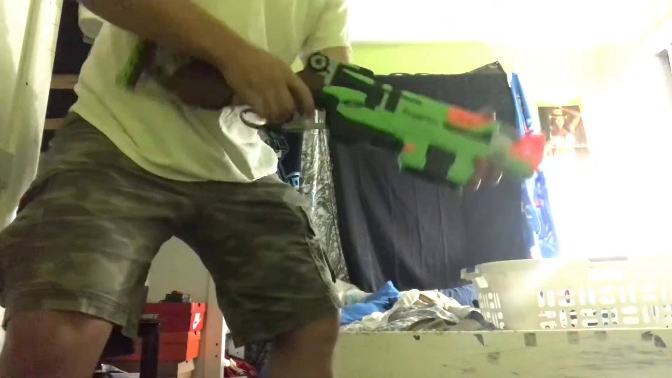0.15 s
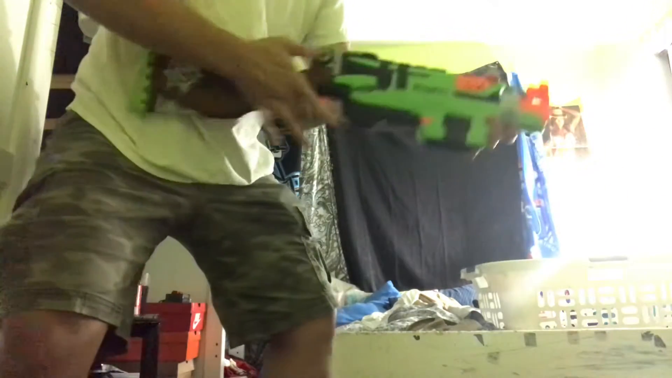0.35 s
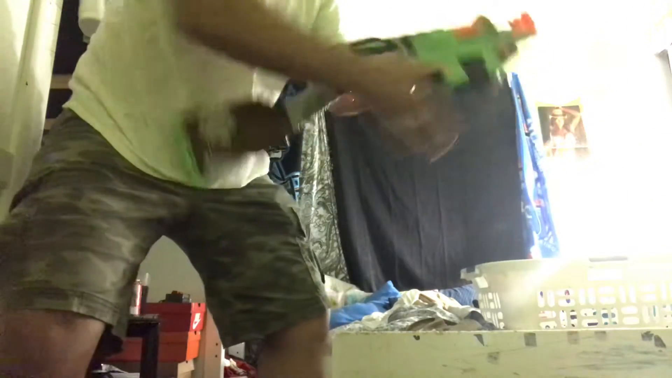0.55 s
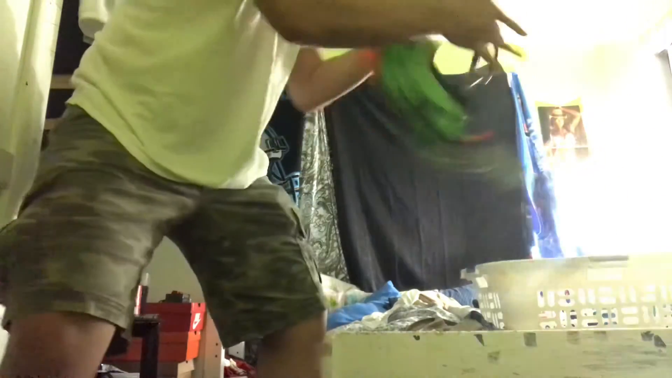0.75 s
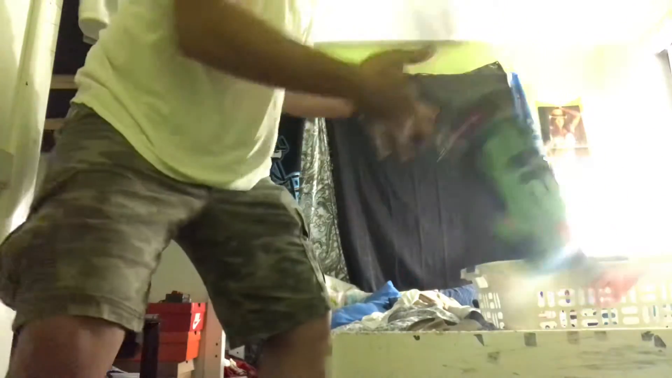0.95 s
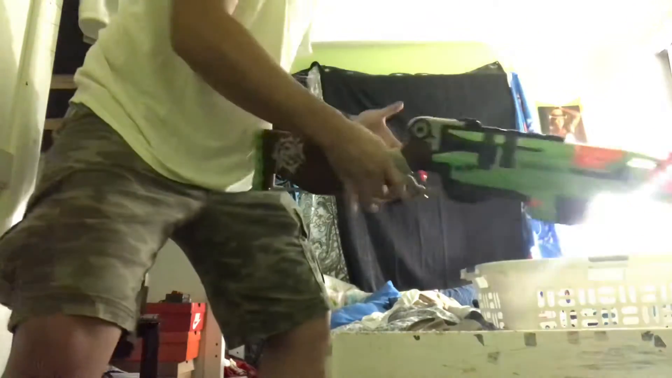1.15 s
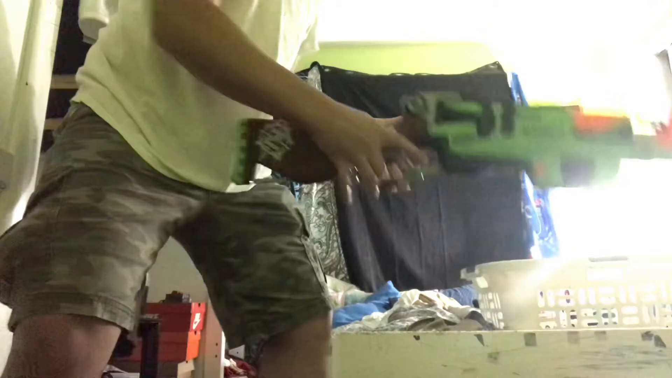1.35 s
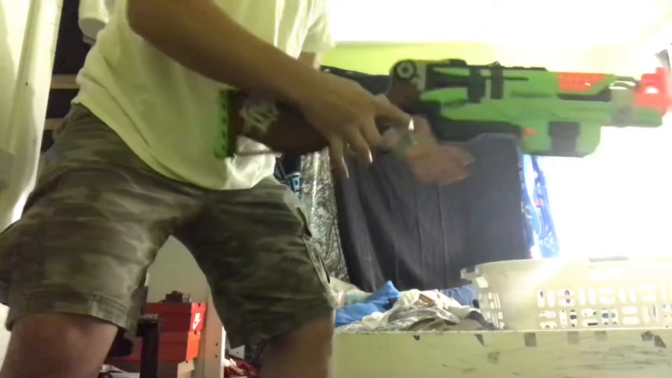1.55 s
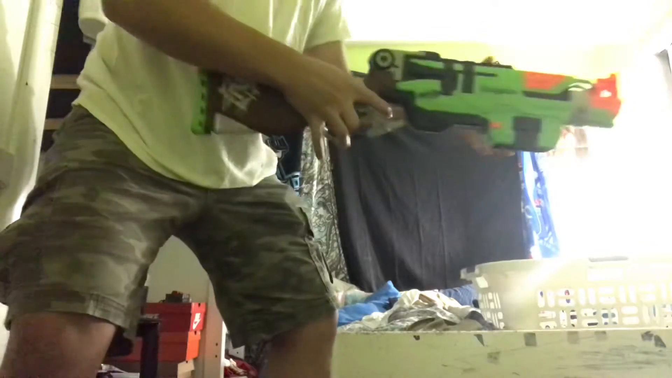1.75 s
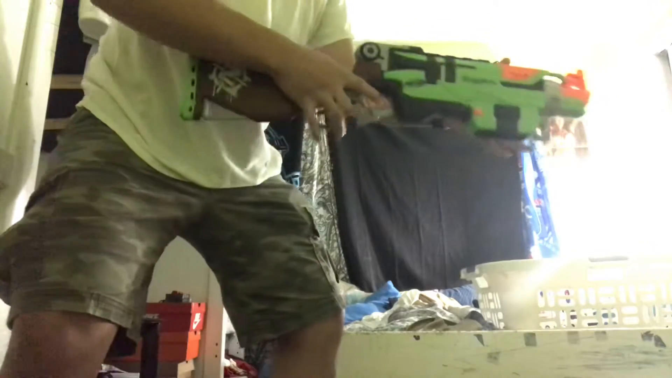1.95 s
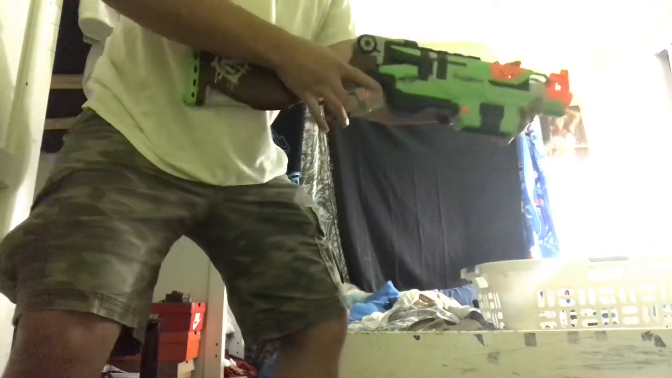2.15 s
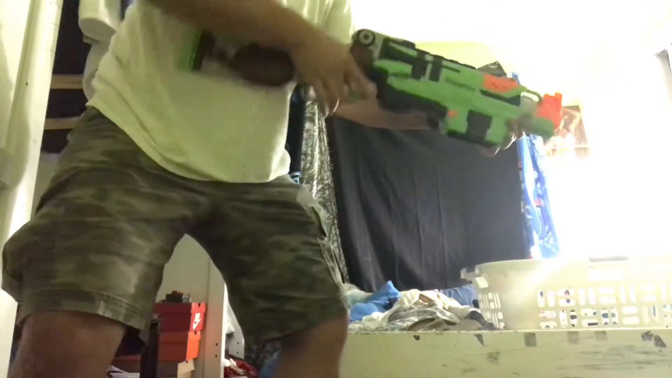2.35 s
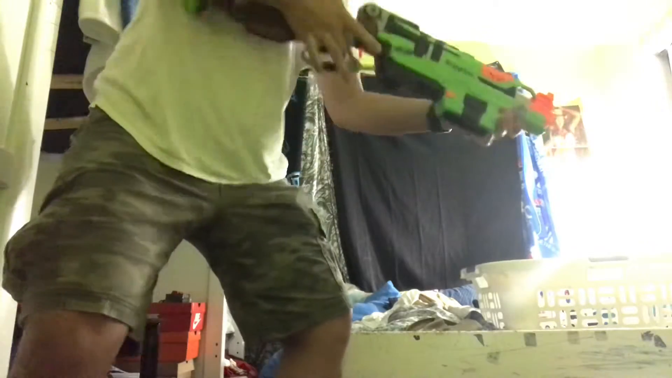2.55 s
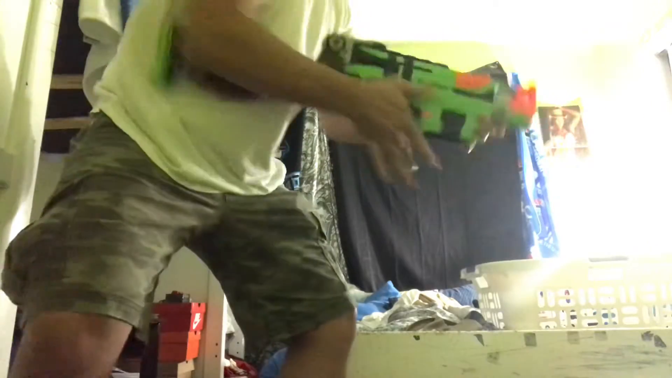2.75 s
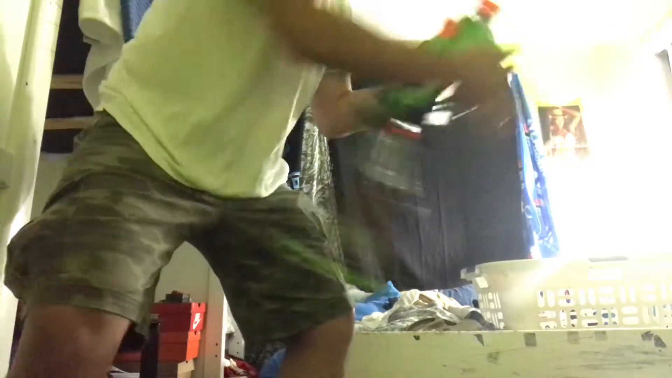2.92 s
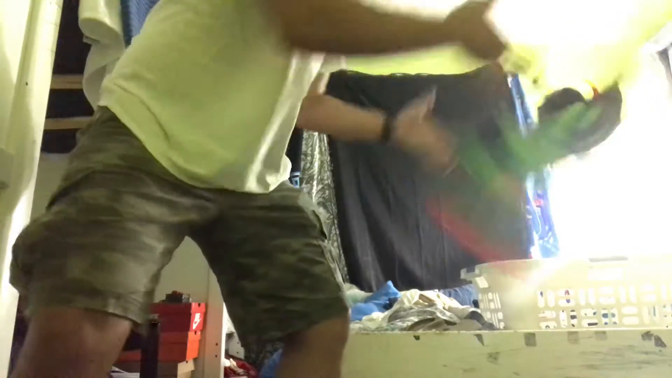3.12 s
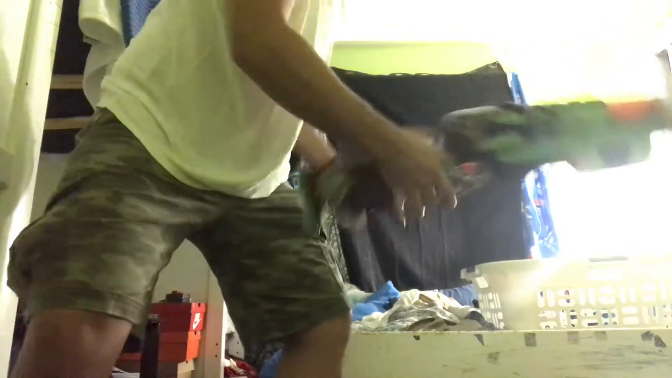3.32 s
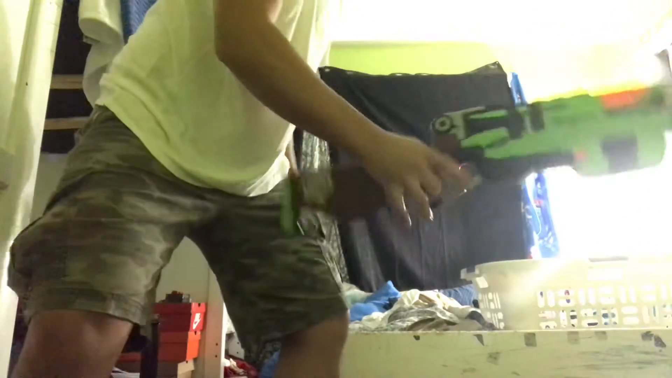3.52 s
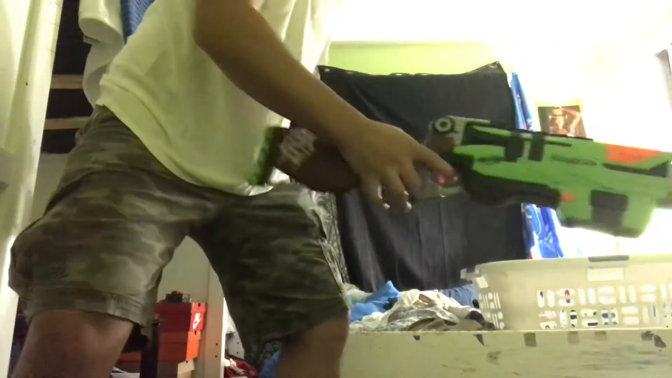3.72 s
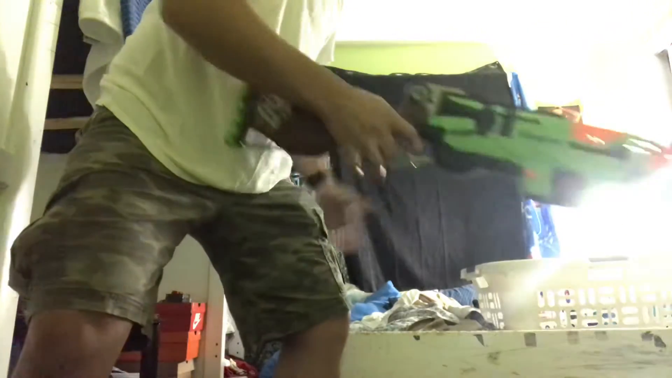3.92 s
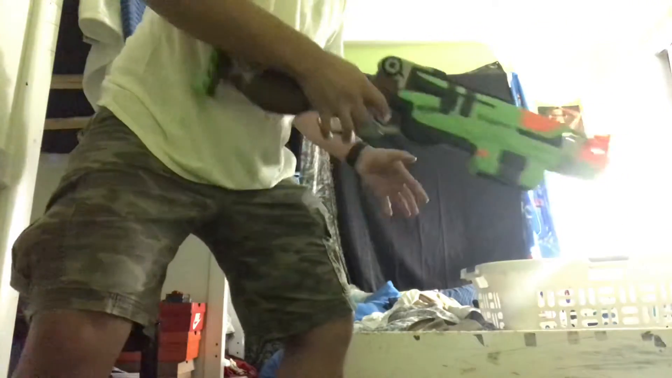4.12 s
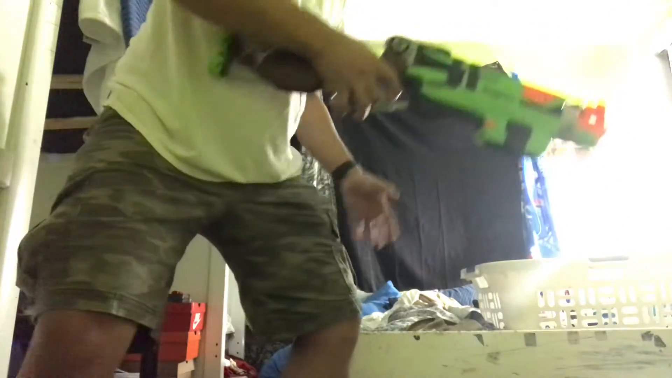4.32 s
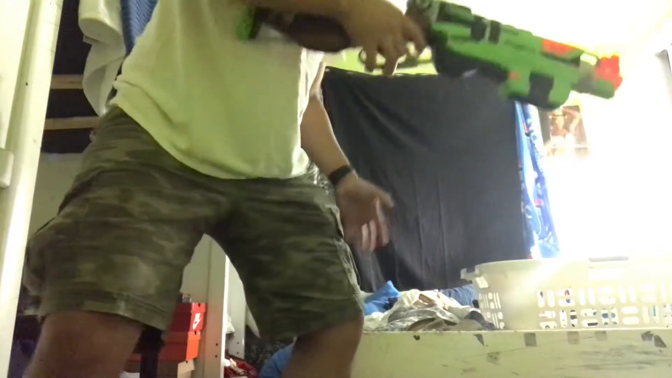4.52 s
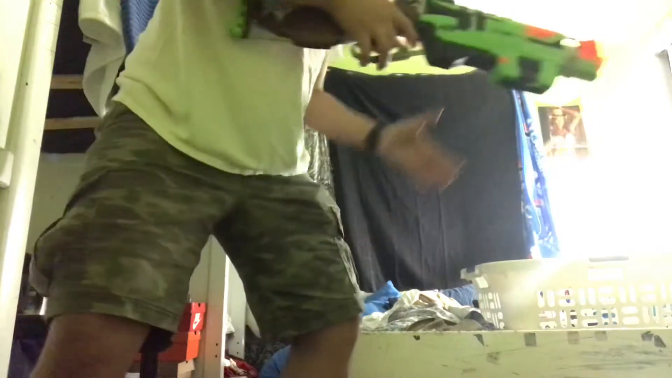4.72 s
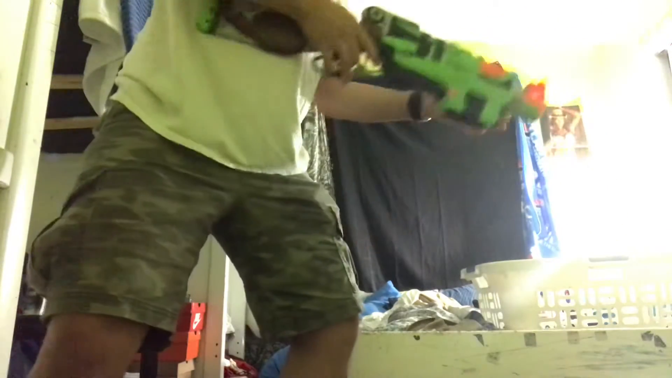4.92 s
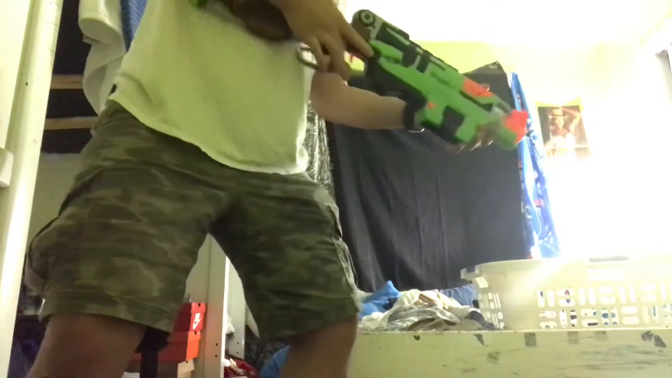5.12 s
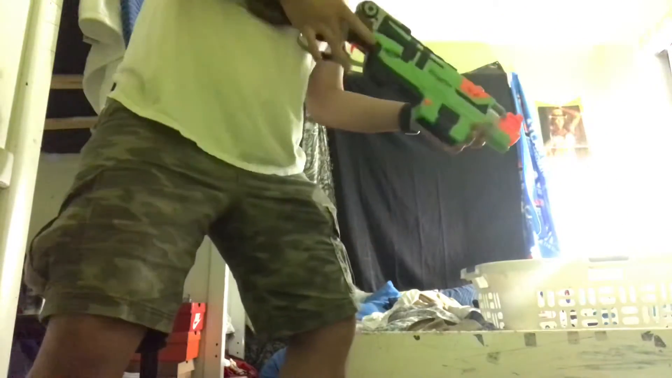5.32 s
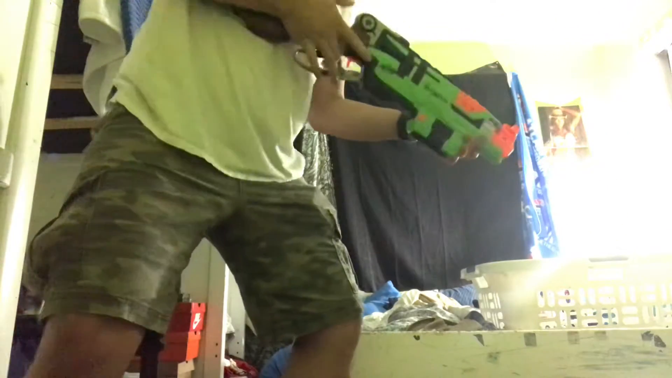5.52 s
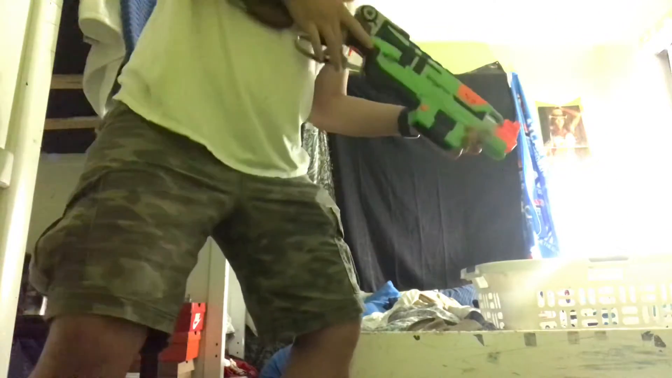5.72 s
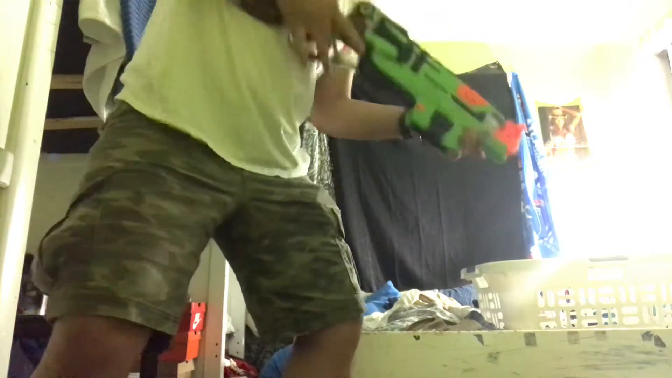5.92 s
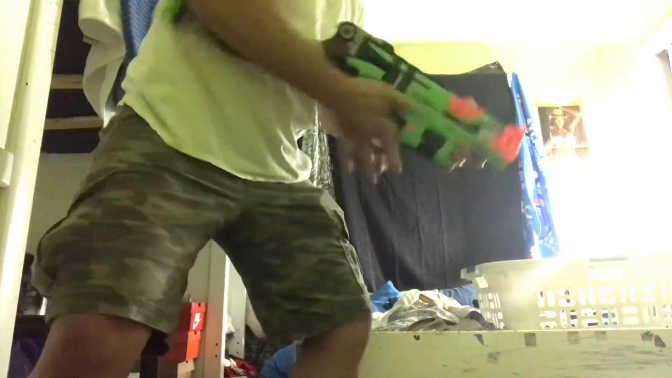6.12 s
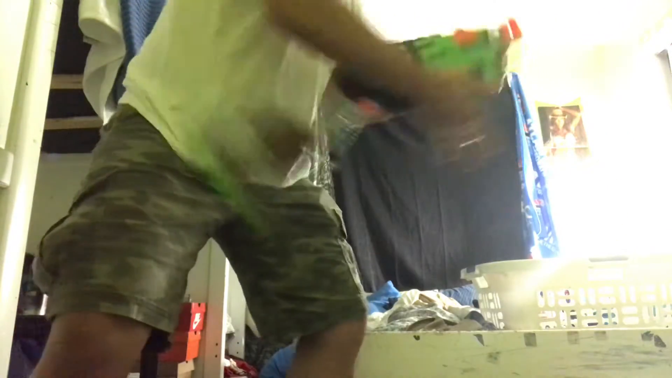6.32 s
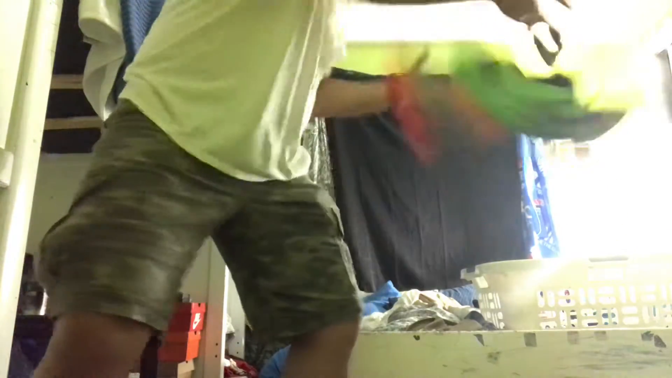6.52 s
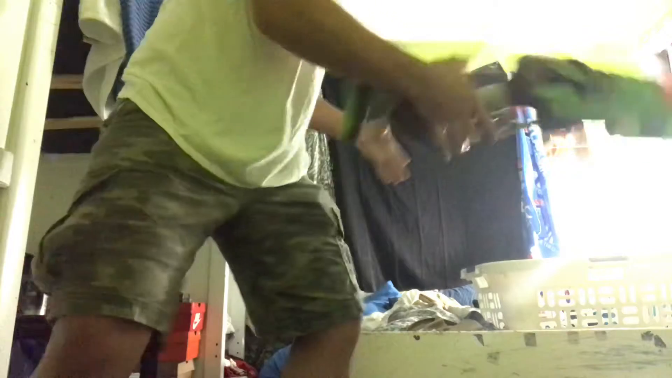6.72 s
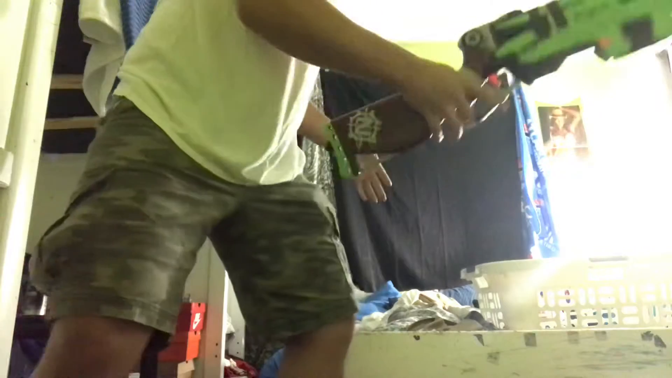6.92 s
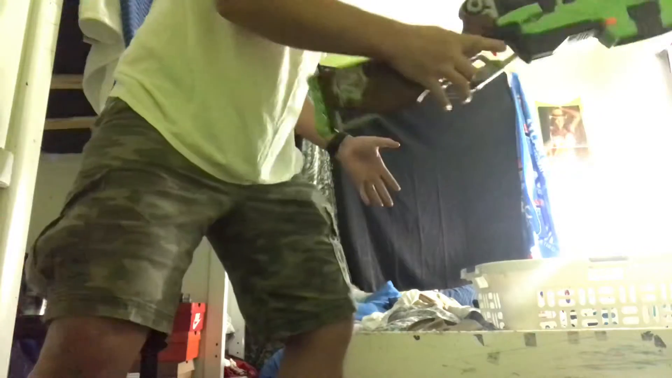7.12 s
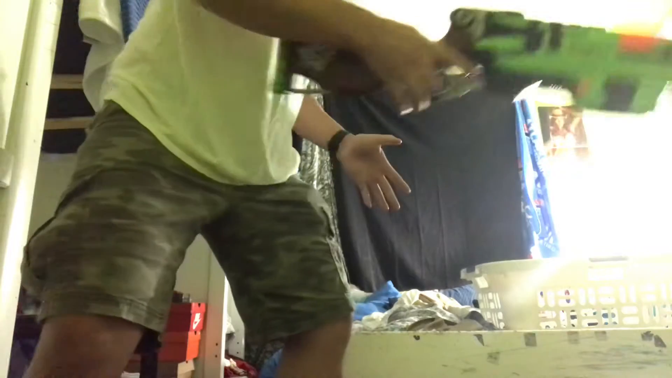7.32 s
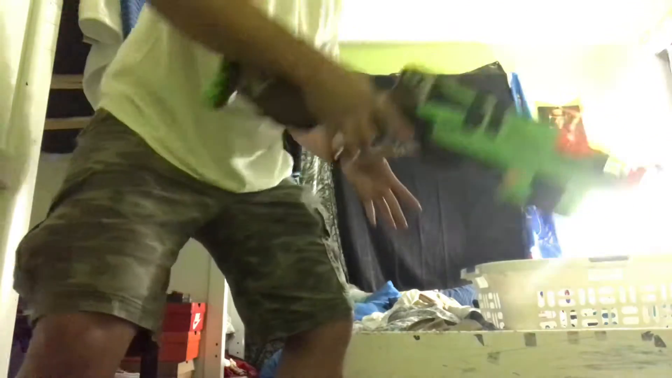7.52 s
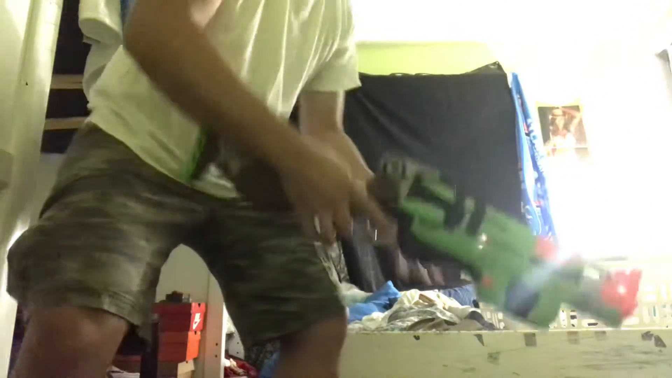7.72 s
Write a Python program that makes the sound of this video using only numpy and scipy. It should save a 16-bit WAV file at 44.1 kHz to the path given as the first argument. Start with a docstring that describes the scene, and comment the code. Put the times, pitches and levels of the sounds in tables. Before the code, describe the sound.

A close, slightly dull-topped microphone catches a hollow plastic toy being spun and cocked by its lever. Sharp bright clacks, scraping slides and tiny runs of ratchet teeth lead to thudding slams with a short low boom. Three rounds of action are separated by small ticks and rustling clothes; the longest lull comes before the third. The small room answers briefly over quiet hum and room noise.

```python
"""In a small furnished room, a hollow plastic toy gun is spun by its lever and cocked again and again.
Blows excite damped low and mid modes, with short noise bursts for the dense treble modes; sliding,
rattling and cloth swishes are dense uneven clicks, and ratchet teeth strike in quick runs.
The heaviest slams boom as low decaying sines; the room answers with a diffuse tail.
A wavering mains hum and a fuzzy low drone lie over quiet room noise and a rustle."""
import sys
import numpy as np
from scipy import signal
from scipy.io import wavfile
from scipy.ndimage import uniform_filter1d

SR = 44100
rng = np.random.default_rng(int(sys.argv[2]) if len(sys.argv) > 2 else 0)


def generate_wav(sig):
    """Save sig (samples, or channels by samples) to the path in sys.argv[1] as 16-bit PCM at SR."""
    pcm = np.round(np.clip(np.atleast_2d(sig).T, -1, 1) * 32767).astype(np.int16)
    wavfile.write(sys.argv[1], SR, pcm)


N = 346626

# modes of the gun, the low knock first, then the mid clack: pitch_hz, relative_level_db, t60_s
GUN_MODES = [(219.4, -8.5, 0.076), (267, -10, 0.066), (336.3, -6, 0.06), (422.8, 0.5, 0.048),
             (483, -2, 0.064), (550.7, -2.5, 0.069), (617.8, 1, 0.065), (704.5, -5.5, 0.058),
             (549.4, -14.5, .2), (855.5, -9.5, 0.064), (983, 2, 0.029), (1121, 1, 0.028),
             (1245, -1.5, 0.025), (1544, 0.5, 0.022), (1684, -0.5, 0.029), (1824, 2.5, 0.023),
             (2088, -5, 0.028), (2290, -9.5, 0.021)]
KNOCK_MODES, CLACK_MODES = GUN_MODES[:9], GUN_MODES[9:]
# spectrum of the dense treble modes: frequency_hz, relative_level_db_per_hz
TREBLE_SPECTRUM = [(1180, -47), (2000, 3.5), (2680, -2), (2930, -2), (4360, -4.5), (4920, -7), (6540, -5),
                   (7710, -9.5), (9320, -7), (10500, -11.5), (11400, -7), (14200, -12), (15800, -15.5)]


def gain_of(db):
    """Decibels are logarithmic: 20 dB is a tenfold amplitude."""
    return 10 ** (np.asarray(db) / 20)


def evened(x):
    """Normalization by the root mean square: the result has rms 1."""
    return x / np.sqrt(np.mean(x ** 2) + 1e-20)


def read(points, hz):
    """Interpolation of a spectrum along a logarithmic frequency axis."""
    point_hz, value = np.transpose(points)
    return np.interp(np.log(hz + 1), np.log(point_hz + 1), value)


def add(mix, start_s, sound):
    """Superposition: a sound adds to the mix from its start time."""
    part = mix[max(round(start_s * SR), 0):][:len(sound)]
    part += sound[:len(part)]


def colour(points, lo_hz=1, hi_hz=30000):
    """Minimum phase: the log spectrum fixes a causal filter, here of unit energy between two edges."""
    hz = abs(np.fft.fftfreq(4096, 1 / SR)) + 1
    edges = np.sqrt((1 + (lo_hz / hz) ** 8) * (1 + (hz / hi_hz) ** 8))
    log_gain = np.log(np.maximum(gain_of(read(points, hz)) / edges, 1e-5))
    # the Hilbert transform of the log gain supplies the phase
    taps = np.fft.ifft(np.exp(np.conj(signal.hilbert(log_gain)))).real[:2048]
    return taps / np.linalg.norm(taps)


def drift(top_hz):
    """Low-pass filtering turns white noise into a slow random motion, rms 1."""
    low_pass = signal.butter(2, top_hz, fs=SR, output="sos")
    return evened(signal.sosfilt(low_pass, rng.standard_normal(N)))


def noise(points, patchy_db, flicker_db):
    """Short-time synthesis: random spectra with drifting patches and broadband flicker, rms 1."""
    frames, hz = N // 256 + 5, np.fft.rfftfreq(1024, 1 / SR)
    real, imaginary, patches = rng.standard_normal((frames, 513, 3)).T
    patches = uniform_filter1d(patches, 12, 0)  # smooth over frequency
    patches = evened(uniform_filter1d(patches, 8, 1))  # smooth over time
    flicker = evened(uniform_filter1d(rng.standard_normal(frames), 3))
    level_db = read(points, hz)[:, None] + patchy_db * patches + flicker_db * flicker
    spectra = (real + 1j * imaginary) * gain_of(level_db)
    return evened(signal.istft(spectra, nperseg=1024, noverlap=768)[1][:N])


def room_noise():
    """Filtered noise: a fixed spectrum colours random noise that drifts and flickers."""
    # frequency_hz, relative_level_db_per_hz
    air_spectrum = [(15, -54.5), (25, -5), (72, -3), (123, -19.5), (144, -19), (174, -18), (403, -20),
                    (486, -23), (791, -33.5), (1220, -35), (2200, -33), (13100, -46.5), (15800, -47)]
    return noise(air_spectrum, patchy_db=3.5, flicker_db=1.0)


def mains_hum():
    """Amplitude modulation: a steady sine near 120 Hz wavers at random."""
    hum_hz, waver_top_hz, waver_rms_db = 119.7, 11, 0.9
    sine = np.sqrt(2) * np.sin(2 * np.pi * hum_hz * np.arange(N) / SR)
    return sine * gain_of(waver_rms_db * drift(waver_top_hz))


def low_drone():
    """Narrow-band noise: two slow random motions modulate a sine and a cosine in quadrature."""
    centre_hz, half_width_hz = 56.6, 4.6
    turn = 2 * np.pi * centre_hz * np.arange(N) / SR
    return drift(half_width_hz) * np.sin(turn) + drift(half_width_hz) * np.cos(turn)


def rustle():
    """Amplitude modulation: rustling noise on a drawn level curve, swelling after the heavy blows."""
    # level of the rustle: time_s, level_db
    rustle_levels = [(0.0, -41.5), (0.24, -58), (0.85, -52), (1.33, -62.5), (1.62, -50), (1.95, -62.5),
                     (2.63, -69), (2.76, -53.5), (3.81, -66), (4.05, -51.5), (4.33, -63.5), (4.77, -70),
                     (6.0, -60.5), (6.22, -53.5), (6.39, -67.5), (6.7, -53.5), (7.16, -65.5), (7.86, -66)]
    # frequency_hz, relative_level_db_per_hz
    rustle_spectrum = [(88, -45.5), (150, -20), (264, -1.5), (447, -5), (564, -1.5), (610, 1.5), (801, -2),
                       (1120, -2), (2630, -16), (12800, -31), (15800, -34.5)]
    level_db = np.interp(np.arange(N) / SR, *np.transpose(rustle_levels))
    return gain_of(level_db) * noise(rustle_spectrum, patchy_db=1.1, flicker_db=2.5)


def background():
    """Superposition of independent sources: rustle, hum, drone and room noise."""
    # level of the hum, which drone and room noise follow: time_s, level_db
    hum_levels = [(0.0, -54.5), (1.34, -54), (1.74, -55), (2.11, -55.5), (2.47, -49), (4.67, -55),
                  (7.8, -58)]
    drone_db, air_db = -8, -2.5  # against the hum
    hum_level_db = np.interp(np.arange(N) / SR, *np.transpose(hum_levels))
    steady = mains_hum() + gain_of(drone_db) * low_drone() + gain_of(air_db) * room_noise()
    return rustle() + gain_of(hum_level_db) * steady


def room(x):
    """Diffuse reverberation: sparse taps of random sign, each band decaying at its own rate."""
    # bands of the tail: frequency_hz, t60_s, relative_level_db
    bands = np.array([(100, 0.063, -9), (406, 0.14, -3.5), (1070, 0.22, -3.5), (3057, 0.2, -2),
                      (8000, 0.17, 0.5), (14900, 0.12, -2.5)])
    count, step_s = 6, .012  # the paths change as the gun moves: six tails crossfade in a cycle
    build_s = 0.0059  # the walls answer a few milliseconds late
    out = np.zeros(N)
    place = np.arange(N) / SR / step_s % count
    for k in range(count):
        away = (place - k + count / 2) % count - count / 2
        share = np.cos(np.pi / 2 * np.clip(away, -1, 1))
        taps = np.zeros(SR // 2)
        at = np.arange(120, SR // 2 - 10, 10)
        build = 1 - np.exp(-(at / SR / build_s) ** 2)
        taps[at + rng.integers(0, 10, len(at))] = build * rng.choice([-1., 1.], len(at))
        hz, t, spectra = signal.stft(taps, SR, nperseg=256)
        start_db = read(bands[:, [0, 2]], hz)[:, None]
        t60_s = read(bands[:, :2], hz)[:, None]
        spectra *= gain_of(start_db - 60 * t / t60_s)
        tail = signal.istft(spectra, SR, nperseg=256)[1]
        out += signal.oaconvolve(x * share, tail / np.linalg.norm(tail))[:N]
    return out


def booms():
    """Modal resonance: a slam excites a low room mode that swells briefly and dies."""
    # heavy slams that shake the room: start_s, swell_peak_db, pitch_hz
    slams = [(0.014, -15, 75), (0.965, -36, 70.5), (0.986, -28, 74), (1.486, -54, 74), (1.533, -16, 75),
             (3.223, -48.5, 75), (3.238, -24.5, 71.7), (3.907, -14.5, 73.7), (6.712, -33.5, 75.3),
             (7.848, -16.5, 70.5)]
    swell_s = 0.0081  # time to the peak of the envelope
    out, t = np.zeros(N), np.arange(9000) / SR
    swell = t / swell_s * np.exp(1 - t / swell_s)
    for start_s, peak_db, pitch_hz in slams:
        add(out, start_s, gain_of(peak_db) * swell * np.sin(2 * np.pi * pitch_hz * t))
    return out


def ring(modes, chance, spread_db, detune, rise_s, spot_hz=1200, focus_db=0):
    """Modal excitation: the struck spot favours damped modes near its own pitch; peak 1."""
    hz, db, t60_s = np.transpose(modes)[:, :, None]
    t = np.arange(5000) / SR
    spot, grip, phase = chance[:, :len(modes), None]
    focus_loss_db = np.minimum(focus_db * np.log2(hz / spot_hz) ** 2, 11)
    mode_db = db + spread_db * spot - focus_loss_db
    decay = gain_of(mode_db - 60 * t / t60_s)
    waves = decay * np.sin(2 * np.pi * hz * (1 + detune * grip) * t + phase)
    sound = waves.sum(0) * (1 - np.exp(-t / rise_s)) ** 2
    return sound / abs(sound).max()


def slides():
    """Source and filter: dense uneven clicks through the modes make sliding, rattling and cloth swishes."""
    # strokes of sliding, rattling and cloth swishes, brightness being the treble against the force:
    # start_s, length_s, first_force_db, last_force_db, brightness_db
    strokes = [(.018, 0.053, -13, -19.5, -6.5), (0.165, 0.052, -36.5, -37.5, -12),
               (0.296, 0.036, -55.5, -41.5, -1.5), (0.429, .008, -50, -43.5, 1),
               (0.438, .045, -48.5, -13.5, -17.5), (0.494, 0.13, -19.5, -29.5, -2.5),
               (0.546, 0.02, -32, -21, -12), (0.586, 0.021, -30, -47, 9.5), (.865, 0.13, -47, -30, 0),
               (0.95, 0.046, -20.5, -17, -4.5), (1.531, 0.061, -7.5, -27, -7),
               (2.618, 0.032, -37.5, -12.5, -11.5), (2.653, 0.12, -12.5, -33.5, -3.5),
               (2.704, .016, -32.5, -22, -9.5), (2.733, 0.01, -16.5, -24, -14.5),
               (2.858, 0.071, -30, -37.5, -11.5), (3.137, 0.013, -56, -46, 1), (3.152, 0.086, -36, -30, 3),
               (3.24, 0.024, -14, -15, -14.5), (3.905, .061, -11.5, -22, -4.5),
               (4.887, .03, -50, -57, -20.5), (4.927, 0.12, -46.5, -54, -8), (5.39, 0.11, -61, -58, -3),
               (6.042, .022, -38.5, -18, -4), (6.067, 0.087, -12.5, -33, 0),
               (6.129, .014, -35.5, -22.5, -10.5), (6.145, .02, -12.5, -40, -0.5),
               (6.284, .11, -34, -35, -16), (6.615, .016, -52.5, -37, -15), (6.649, 0.082, -37, -29, 6.5),
               (6.723, 0.019, -18, -52, 3)]
    modes_db, treble_db = -13.5, -8.5  # how readily the gun modes and the treble answer the force
    grip_s, let_go_s = 0.0022, 0.039  # a stroke takes hold, then dies away (60 dB)
    clicks_per_s = 3000
    low, high = np.zeros((2, N))
    u = np.arange(SR // 4) / SR
    for start_s, length_s, first_db, last_db, bright_db in strokes:
        force_db = np.interp(u, (0, length_s), (first_db, last_db))
        force_db = force_db - 60 * np.maximum(u - length_s, 0) / let_go_s
        force = np.minimum(u / grip_s, 1) * gain_of(force_db)
        add(low, start_s, force * gain_of(modes_db))
        add(high, start_s, force * gain_of(bright_db + treble_db))
    strength = gain_of(2.4 * np.minimum(rng.exponential(1, N), 3.5))
    happens = rng.random(N) < clicks_per_s / SR
    clicks = evened(happens * strength * rng.choice([-1, 1], N))
    chance = rng.standard_normal((3, len(GUN_MODES)))
    response = ring(GUN_MODES, chance, spread_db=2.5, detune=0, rise_s=0.00016)
    low_sound = signal.oaconvolve(clicks * low, response / np.linalg.norm(response))[:N]
    treble_sound = signal.oaconvolve(clicks * high, colour(TREBLE_SPECTRUM, 2300))[:N]
    return low_sound + treble_sound


def ratchet_teeth():
    """Near-periodic impacts: evenly spaced, slightly uneven strikes whose level glides along each run."""
    # runs of teeth as the lever swings home: start_s, end_s, first_clack_db, last_clack_db
    runs = [(0.9123, 0.963, -27.5, -25.5), (3.185, 3.218, -24, -27), (6.667, 6.699, -24, -28)]
    # one tooth, levels against the clack: clack_hz, knock_db, knock_hz, crack_db, tick_db
    clack_hz, knock_db, knock_hz, crack_db, tick_db = (1346, -8.5, 616, -4, 4)
    teeth_per_s, jitter_s, spread_db = 108, .001, 1.5  # jitter and spread are rms
    rows = []
    for start_s, end_s, first_db, last_db in runs:
        luck = rng.standard_normal((12, 4))
        for s, chance in zip(np.arange(start_s, end_s, 1 / teeth_per_s), luck):
            db = np.interp(s, (start_s, end_s), (first_db, last_db)) + spread_db * chance[1:]
            rows.append((s + jitter_s * chance[0], db[0], clack_hz, db[1] + knock_db, knock_hz,
                         db[2] + crack_db, db[2] + tick_db))
    return rows


def strikes():
    """Impact excitation: a blow rings the low and mid modes and sends noise bursts through the treble."""
    # individually timed strikes, including the louder ratchet teeth; mid clack, low knock,
    # treble crack below 6.5 kHz and high tick above:
    # start_s, clack_db, clack_hz, knock_db, knock_hz, crack_db, tick_db
    timed_strikes = [(0.013, -8.5, 1520, -17.5, 460, -20, -23), (0.018, -10, 1026, -14, 550, -33, -17),
                     (0.17, -39, 1490, -52.5, 462, -50, -46), (0.177, -37, 1600, -40.5, 580, -47, -55),
                     (0.248, -34, 1190, -56, 458, -55.5, -62), (0.257, -32.5, 1220, -39, 554, -48.5, -63),
                     (0.304, -45, 980, -53, 573, -47.5, -55), (0.318, -37.5, 1720, -44, 546, -50, -55),
                     (0.437, -30.5, 985, -36, 573, -40, -32), (0.453, -25, 1220, -29.5, 600, -36, -34),
                     (0.481, -7.5, 1520, -13.5, 465, -17, -13.5), (0.524, -16, 980, -45, 503, -42, -21),
                     (0.575, -9.5, 970, -36, 678, -29, -21), (0.58, -14, 990, -18.5, 476, -25, -23),
                     (0.592, -24, 1750, -22.5, 420, -23.5, -28), (0.665, -31, 1040, -34.5, 500, -37.5, -50),
                     (0.755, -43, 1770, -54, 501, -55, -53), (0.787, -45, 1090, -58, 563, -61, -47.5),
                     (0.852, -38, 974, -53, 506, -37.5, -42), (0.86, -30, 1300, -40, 624, -33, -27),
                     (0.889, -29, 1270, -32, 638, -43, -49), (0.904, -31, 1120, -33, 668, -33, -29),
                     (0.959, -25, 1130, -25, 576, -17.5, -22), (0.973, -17, 1610, -23, 570, -19, -33),
                     (0.993, -11.5, 1110, -22, 568, -24.5, -35), (1.089, -43, 1010, -44.5, 584, -46, -64),
                     (1.247, -57, 1090, -55, 406, -56, -62), (1.373, -36, 1770, -59, 439, -53, -70),
                     (1.38, -47, 1110, -49, 623, -46.5, -69), (1.397, -41, 972, -54, 409, -57, -64),
                     (1.427, -39.5, 1610, -41.5, 428, -52, -72), (1.487, -38, 1510, -51, 576, -50, -60),
                     (1.513, -40, 1050, -39, 577, -52, -55), (1.528, -10, 1230, -20, 493, -23, -21),
                     (1.537, -10, 1010, -9, 549, -37, -32), (1.69, -49, 993, -42, 538, -62, -62),
                     (1.719, -40, 945, -49, 498, -49, -51), (1.749, -34, 1187, -38.5, 606, -46.5, -44.5),
                     (1.757, -32, 1180, -45, 555, -55, -59), (1.786, -57, 1070, -55, 547, -53, -52),
                     (1.817, -40.5, 1290, -34, 630, -52, -53), (1.872, -51, 1010, -70, 603, -60, -53.5),
                     (2.002, -47, 1100, -48, 607, -61, -60), (2.177, -43.5, 1090, -52.5, 616, -57.5, -73),
                     (2.255, -47, 1110, -54, 444, -58.5, -69), (2.568, -50, 1560, -71, 678, -56, -54),
                     (2.597, -36, 1100, -45, 654, -51, -51), (2.626, -24.5, 1000, -47, 616, -38, -28),
                     (2.641, -16, 1550, -45, 614, -29, -25), (2.65, -8, 1660, -17.5, 550, -17.5, -14),
                     (2.671, -13.5, 950, -16.5, 608, -43, -35), (2.725, -7.5, 990, -23, 423, -25.5, -15.5),
                     (2.736, -13, 1500, -23, 571, -19, -15.5), (2.858, -25.5, 1160, -30.5, 620, -41, -36.5),
                     (2.908, -30.5, 1140, -42.5, 633, -45, -52), (2.918, -30, 1140, -41, 638, -38.5, -46),
                     (3.013, -44, 1310, -55, 622, -63, -71), (3.048, -39.5, 1120, -47, 595, -54, -67),
                     (3.118, -43, 950, -52.5, 592, -57, -65), (3.158, -27, 1660, -35, 576, -41, -39),
                     (3.171, -28.5, 1050, -32, 595, -18, -24), (3.198, -33, 1300, -33, 614, -24, -29),
                     (3.217, -23, 1050, -38, 665, -17, -17), (3.225, -18, 1050, -20.5, 592, -15.5, -16),
                     (3.239, -11.5, 1340, -13, 441, -15.5, -18), (3.384, -49.5, 1040, -45, 401, -55, -70),
                     (3.422, -44, 1020, -45.5, 670, -57, -73), (3.481, -46.5, 1760, -49.5, 568, -59, -72),
                     (3.859, -34.5, 1250, -43, 627, -36, -47), (3.895, -34, 1040, -30, 560, -46, -44),
                     (3.903, -9.5, 1720, -19.5, 433, -18.5, -21), (3.908, -11.5, 1010, -13, 560, -40, -18),
                     (4.064, -40, 940, -39.5, 534, -50, -65), (4.097, -49, 953, -50, 530, -51, -50),
                     (4.14, -34.5, 1130, -56, 641, -50, -63), (4.149, -32, 1240, -45, 573, -54, -62),
                     (4.287, -32, 980, -32.5, 597, -42.5, -39), (4.553, -42.5, 1344, -44, 624, -48.5, -54),
                     (4.689, -32.5, 1000, -33, 670, -38.5, -37), (4.928, -50.5, 1660, -52, 581, -55, -58),
                     (4.951, -44.5, 1180, -44, 456, -52, -61), (4.967, -41.5, 1140, -46, 440, -46.5, -59),
                     (5.034, -43, 1240, -47.5, 490, -63, -70), (5.059, -45.5, 1120, -51, 482, -66, -73),
                     (5.155, -49.5, 1110, -66, 490, -67, -72), (5.261, -49, 1210, -67, 490, -70, -71),
                     (5.321, -46, 1110, -56, 509, -67, -69), (5.455, -44, 1500, -50, 470, -59, -58),
                     (5.685, -47, 982, -50.5, 401, -70, -68), (5.911, -49, 1460, -53, 571, -53.5, -57),
                     (6.011, -39.5, 950, -42, 549, -53, -55), (6.045, -33, 1110, -36, 659, -41, -38),
                     (6.06, -18, 1140, -26, 510, -29.5, -25), (6.068, -11, 1540, -16.5, 393, -21, -15),
                     (6.082, -10, 1440, -22.5, 497, -34, -16), (6.142, -7.5, 920, -17, 460, -23, -20),
                     (6.156, -16.5, 1750, -29, 475, -18.5, -16.5),
                     (6.295, -27.5, 1270, -37, 624, -40, -38.5), (6.335, -34, 1040, -47, 471, -45, -42),
                     (6.351, -32, 1130, -42, 640, -45, -43), (6.377, -41, 1190, -43, 536, -56, -56),
                     (6.393, -32.5, 1160, -47, 511, -41.5, -54), (6.53, -31, 950, -38, 633, -37, -46.5),
                     (6.635, -24, 1140, -45, 678, -38.5, -37), (6.65, -20.5, 1190, -27, 600, -21, -33),
                     (6.702, -16.5, 1180, -41, 503, -18.5, -22), (6.71, -20, 1270, -15, 400, -27, -27.5),
                     (6.716, -11.5, 1220, -9, 620, -18.5, -43), (6.741, -19, 964, -30, 571, -34.5, -40),
                     (6.85, -63, 1210, -46, 606, -63, -73), (6.907, -46, 950, -42.5, 603, -62, -67),
                     (7.057, -49.5, 1340, -49, 634, -56, -69.5),
                     (7.375, -35.5, 1095, -43, 579, -48.5, -58.5), (7.819, -40, 1030, -45, 579, -45, -58),
                     (7.826, -30, 1040, -35, 589, -33.5, -47), (7.847, -17.5, 1130, -22, 446, -12.5, -34),
                     (7.852, -12, 1025, -9, 614, -33, -20)]
    crack_t60_s, crack_rise_s = 0.046, 0.00067
    tick_t60_s, tick_rise_s = 0.021, 0.0006
    ringing, crack, tick = np.zeros((3, N))
    t = np.arange(1200) / SR
    rows = list(timed_strikes) + ratchet_teeth()
    chances = rng.standard_normal((len(rows), 2, 3, 16))
    bursts = rng.standard_normal((len(rows), 2, 1200))
    for row, chance, burst in zip(rows, chances, bursts):
        start_s, clack_db, clack_hz, knock_db, knock_hz, crack_db, tick_db = row
        knock = ring(KNOCK_MODES, chance[0], spread_db=3.3, detune=0.012, rise_s=0.0014,
                     spot_hz=knock_hz, focus_db=45)
        clack = ring(CLACK_MODES, chance[1], spread_db=2.5, detune=0.023, rise_s=.0009,
                     spot_hz=clack_hz, focus_db=23.5)
        add(ringing, start_s, gain_of(knock_db) * knock + gain_of(clack_db) * clack)
        crack_decay = gain_of(crack_db - 60 * t / crack_t60_s)
        add(crack, start_s, crack_decay * (1 - np.exp(-t / crack_rise_s)) * burst[0])
        tick_decay = gain_of(tick_db - 60 * t / tick_t60_s)
        add(tick, start_s, tick_decay * (1 - np.exp(-t / tick_rise_s)) * burst[1])
    crack_sound = signal.oaconvolve(crack, colour(TREBLE_SPECTRUM, 1900, 6500))[:N]
    tick_sound = signal.oaconvolve(tick, colour(TREBLE_SPECTRUM, 6500))[:N]
    return ringing + crack_sound + tick_sound


def scene():
    """Superposition: the gun with its reflections, over the booms and the background."""
    gun = strikes() + slides()
    reflections = gain_of(-5.0) * room(gun)
    return (gun + reflections + booms() + background())[None]


def record(dry):
    """Band limiting and compression: deep bass is lost, loud blows are eased, the top is cut."""
    threshold_db, removed_share = -27, 0.068  # share of the excess taken away
    fall_db_per_s = 59  # how fast the held level falls after a blow
    edge_hz = 15750
    thin = signal.sosfilt(signal.butter(4, 46, "high", fs=SR, output="sos"), dry)
    power_db = 10 * np.log10(abs(uniform_filter1d(thin[0] ** 2, size=400)) + 1e-12)
    # a running maximum on a rising ramp makes a peak holder that falls steadily
    fall_db = np.arange(N) * fall_db_per_s / SR
    held_db = np.maximum.accumulate(power_db + fall_db) - fall_db
    over_db = np.maximum(held_db - threshold_db, 0)
    ducked = thin / gain_of(removed_share * uniform_filter1d(over_db, size=200))
    low_pass = signal.firwin(511, edge_hz, window=("kaiser", 9), fs=SR)
    return signal.oaconvolve(ducked, low_pass[None], "same")


dry = scene()
out = record(dry)
generate_wav(out)
```